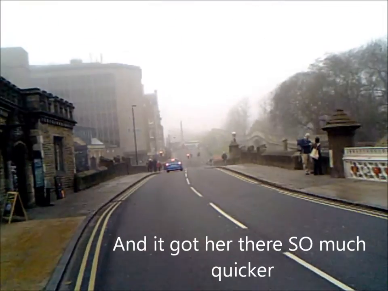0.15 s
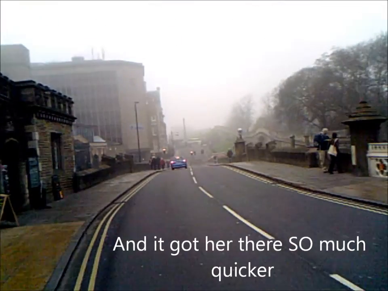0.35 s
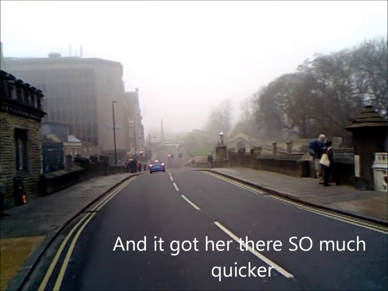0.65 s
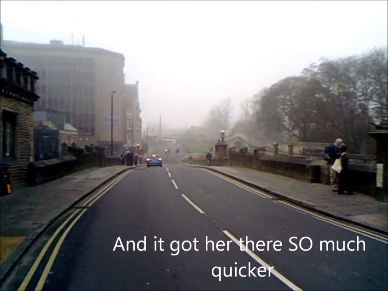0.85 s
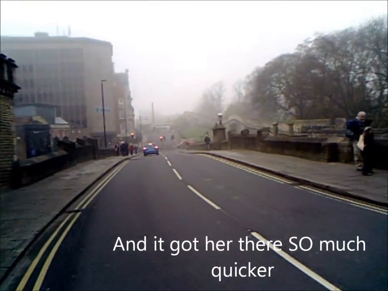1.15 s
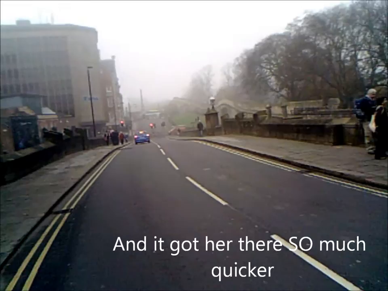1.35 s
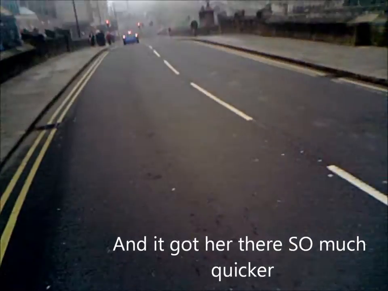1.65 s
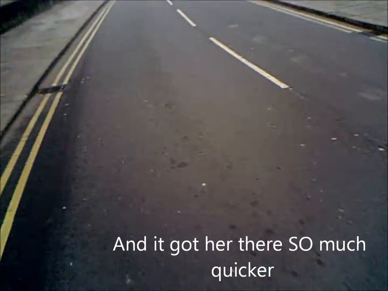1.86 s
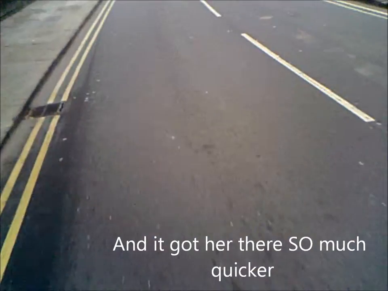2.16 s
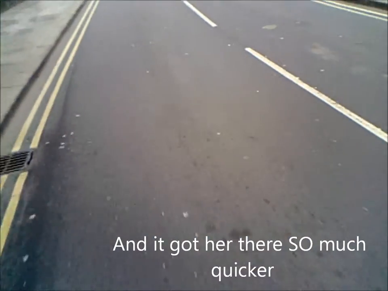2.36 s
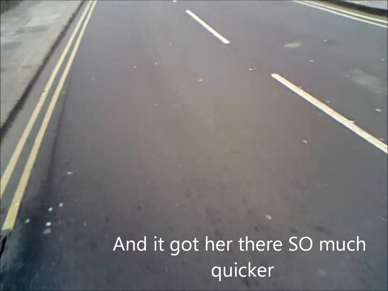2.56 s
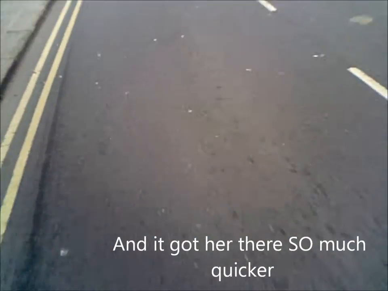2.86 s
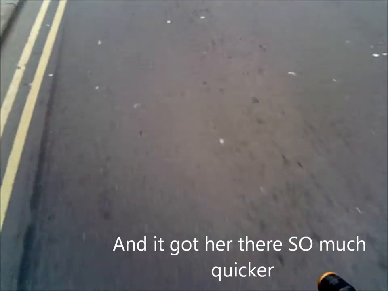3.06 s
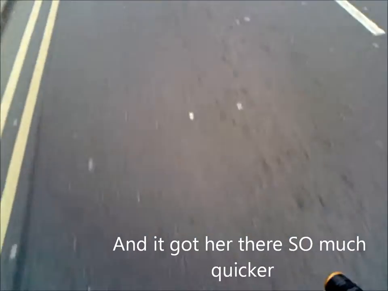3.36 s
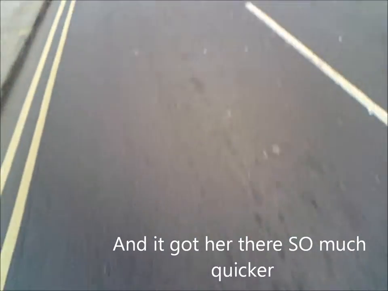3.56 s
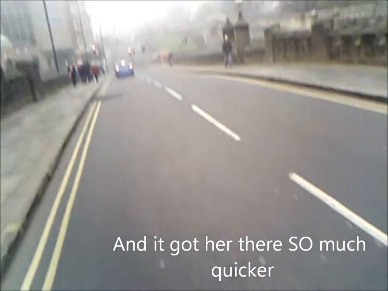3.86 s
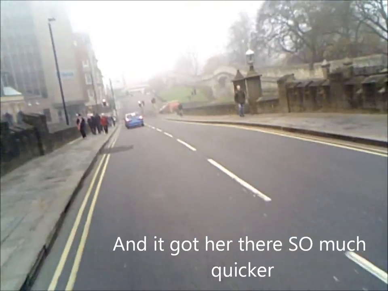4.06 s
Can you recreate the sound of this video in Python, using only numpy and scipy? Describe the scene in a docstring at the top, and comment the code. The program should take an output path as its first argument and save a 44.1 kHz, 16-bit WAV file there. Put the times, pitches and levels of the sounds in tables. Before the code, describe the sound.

Close mono pickup on a moving bicycle outdoors: soft wind rumble and small pressure pops open, then brake pads stick and slip on the rim with a reedy, metallic squeal. The squeal fades into a thin whine with short stutters, comes back firmly, peaks harsh and screaming late on, then eases unevenly. Dull wind gusts keep thudding while tyres and far traffic hiss quietly.

```python
"""Bicycle brake squeal: pads stick and slip on the rim about 400-500 times a second, a stack of partials
with slip-pulsed scraping noise that rings through fork and wheel, breaks off to a thin tone and returns.
Wind buffets the single microphone: filtered low noise in gusts, with short pressure steps.
Tyres and far traffic hiss below, as third-octave noise bands."""
import sys
import numpy as np
from scipy import signal
from scipy.io import wavfile
from scipy.ndimage import uniform_filter1d

SR = 44100
rng = np.random.default_rng(int(sys.argv[2]) if len(sys.argv) > 2 else 0)


def elevation(decibels):
    """Turn decibel levels (scalar or array-like) into linear amplitude ratios."""
    levels = np.asarray(decibels, float)
    return 10 ** (levels / 20)


def int16_out(signal):
    """Quantize to a 16-bit WAV file."""
    q = np.round(np.clip(np.atleast_2d(signal).T, -1, 1) * 32767)
    wavfile.write(sys.argv[1], SR, q.astype(np.int16))


N = 185969


def rms_one(x):
    """Scale to rms 1."""
    return x / np.sqrt(np.mean(x ** 2) + 1e-20)


def in_time(rows):
    """Columns of a curve table, one value a sample."""
    time_s, *columns = np.transpose(rows)
    return [np.interp(np.arange(N) / SR, time_s, column) for column in columns]


def drift(rate_hz):
    """Slow chance: noise twice through a one-pole low-pass at SR / 8; spread 1."""
    pole = np.exp(-16 * np.pi * rate_hz / SR)
    white = rng.standard_normal(N // 8 + 4002)
    slow = signal.lfilter([1], [1, -2 * pole, pole * pole], white)[4000:]   # skip the settling
    return np.interp(np.arange(N) / 8, np.arange(len(slow)), rms_one(slow - slow.mean()))


def cut(x, hz, kind, order=2):
    """Butterworth filter."""
    return signal.sosfilt(signal.butter(order, hz, kind, fs=SR, output="sos"), x)


def evened(x):
    """Level made steady over 40 ms."""
    return x / np.sqrt(uniform_filter1d(x ** 2, size=1764) + 1e-12)


def bump(centre_s, length_s):
    """Bell-shaped swell, down to 1/e at length_s either side of its centre."""
    return np.exp(-((np.arange(N) / SR - centre_s) / length_s) ** 2)


def pressure_steps():
    """Sudden wind pressure steps: decaying noise bursts, low-passed."""
    # start_s, peak_db
    pops = [(0.158, -45), (0.285, -26), (0.298, -40), (0.354, -39), (0.388, -22.5), (0.408, -30),
            (1.024, -24.5), (1.555, -40), (2.649, -24), (2.945, -27), (3.879, -41)]
    steps = np.zeros(N)
    decay = np.exp(-np.arange(900) / SR / 0.00057)
    for (start_s, peak_db), noise in zip(pops, rng.standard_normal((len(pops), 900))):
        pop = cut(cut(noise * decay, 210, "low", order=1), 890, "low")
        steps[round(start_s * SR):][:900] += elevation(peak_db) * pop / np.abs(pop).max()
    return steps


def wind():
    """Turbulence at the microphone: slow sway, lumpy buffeting, faster flutter in bursts, sharp steps."""
    # wind rising and dying away between the gusts: time_s, buffeting_db
    breeze = [(0, -16), (.2, -85), (.5, -50), (.8, -49), (1.5, -70), (1.75, -51), (2.2, -47), (2.5, -28.5),
              (2.8, -31.5), (3.1, -55), (3.45, -22), (3.7, -42), (4.22, -57)]
    # centre_s, buffeting_db, flutter_db, length_s
    gust_swells = [(0.186, -50, -44, 0.019), (0.295, -19, -29, 0.027), (0.404, -21, -39, 0.058),
                   (.59, -20.5, -49, 0.03), (0.722, -34, -48, 0.021), (1.009, -16, -26, 0.023),
                   (1.229, -23.5, -34, 0.024), (1.557, -41, -46, 0.026), (2.161, -34, -59, 0.041),
                   (2.335, -48, -48, 0.014), (2.576, -17, -26.5, 0.022), (2.646, -22, -32, 0.014),
                   (2.966, -28.5, -35, 0.051), (3.13, -26.5, -39, 0.037), (3.238, -15, -34, 0.011),
                   (3.384, -24, -32.5, .025), (3.581, -42, -30.5, .03), (3.865, -32, -34, 0.029),
                   (4.092, -20, -45, 0.034)]
    sway_db = -23.5
    breeze_db, = in_time(breeze)
    flutter_db = -40 + 0.21 * (breeze_db + 42)   # follows only a share of the breeze's swing
    buffet_gain, flutter_gain = elevation(breeze_db), elevation(flutter_db)
    for centre_s, gust_buffet_db, gust_flutter_db, length_s in gust_swells:
        swell = bump(centre_s, length_s)
        buffet_gain = buffet_gain + elevation(gust_buffet_db) * swell
        flutter_gain = flutter_gain + elevation(gust_flutter_db) * swell

    white = rng.standard_normal((3, N))
    lumps = drift(4.2)   # shared by buffeting and flutter
    sway = rms_one(cut(white[2], [3, 15], "band", order=3))
    buffet = cut(evened(cut(white[0], [18, 40], "band", order=1)), 27, "low")
    buffet = rms_one(buffet * elevation(2 * lumps))
    flutter = cut(white[1], 55, "high")
    flutter = cut(cut(flutter, 38, "low", order=1), 49.5, "low", order=1)
    flutter = rms_one(flutter * elevation(2.56 * drift(30.3) + 1.2 * lumps))
    return elevation(sway_db) * sway + buffet_gain * buffet + flutter_gain * flutter + pressure_steps()


def road():
    """Tyres and far traffic: third-octave noise bands, each flickering a little."""
    # time_s, level_db (in the band 580-740 Hz)
    road_level = [(0, -83), (.25, -77), (.5, -70), (.85, -71.5), (1.23, -62.5), (1.62, -73.5), (1.9, -60.5),
                  (2.05, -61.5), (2.3, -65.5), (3.37, -62), (4.22, -62.5)]
    # frequency_hz, density_db (per Hz, relative)
    road_colour = [(180, -17), (300, -0.5), (444, 2), (508, -7), (620, -4.5), (850, -4.5), (1400, -0.5),
                   (1900, -7.5), (3300, -9), (4050, -11.5), (5200, -15.5), (6400, -25), (8910, -19),
                   (11000, -53), (14300, -58), (22000, -120)]
    level_db, = in_time(road_level)
    colour_hz, colour_db = np.transpose(road_colour)
    edges_hz = 250 * 2 ** np.arange(0, 5.7, 1 / 3)
    white = rng.standard_normal((2, N))   # neighbouring bands take different noise
    hiss = np.zeros(N)
    for k, (low_hz, high_hz) in enumerate(zip(edges_hz, edges_hz[1:])):
        centre_octave = np.log2(low_hz * high_hz) / 2
        gain_db = np.interp(centre_octave, np.log2(colour_hz), colour_db) + 1.5 * drift(8)
        hiss += elevation(gain_db) * cut(white[k % 2], [low_hz, high_hz], "band")
    return elevation(level_db) * hiss / np.std(cut(hiss, [580, 740], "band"))


def frame(x):
    """Fork, rim and brake arms: parallel resonances, each applied twice so that the valleys stay dark."""
    # frequency_hz, width_hz (of one pass), level_db
    modes = [(1187, 280, 5.5), (1610, 286, 6), (2073, 150, 1), (2405, 682, 8), (2943, 200, 3),
             (3170, 620, 2.5), (4050, 1580, 0), (4674, 270, 0), (4872, 350, -1.5), (6310, 400, -3.5),
             (7390, 3200, 3.5), (8620, 1020, -1), (9310, 284, -3), (10650, 210, -7)]
    out = np.zeros(N)
    for hz, width_hz, level_db in modes:
        r = np.exp(-np.pi * width_hz / SR)
        numerator = [(1 - r * r) / 2, 0, (r * r - 1) / 2]
        section = numerator + [1, -2 * r * np.cos(2 * np.pi * hz / SR), r * r]
        out += elevation(level_db) * signal.sosfilt([section, section], x)
    return out


def slip_partials(phase, pitch_hz, loose):
    """Regular slips: partials 3-29, each swelling as the contact patch shifts; high ones wander more."""
    start = rng.uniform(0, 2 * np.pi, size=30)   # the frame smears each slip over the cycle
    slips = np.zeros(N)
    for k in range(3, 30):
        swell = elevation(4.88 * loose * drift(35.6))
        wander = 0.088 * k * loose * drift(80)
        slips += swell * np.cos(k * phase + start[k] + wander) * (k * pitch_hz < 11500)
    return slips


def pad_scrape(phase):
    """Rubbing noise pulsed by each slip, brighter than the slips."""
    scrape = rng.standard_normal(N) * (1 + 0.94 * np.cos(phase))
    return scrape + elevation(21) * cut(scrape, 2450, "high")


def brake():
    """Stick-slip of pads on rim: slips and scraping ring the frame, over two separate low partials."""
    # slip rate, jumping between near 500 and near 400 a second: time_s, pitch_hz
    slip_rate = [(0.72, 509), (0.76, 523), (0.785, 414), (0.82, 433.3), (0.855, 434.6), (0.872, 478),
                 (0.905, 498.4), (0.92, 520), (0.958, 473.4), (1.0, 496.7), (1.07, 484), (1.118, 483),
                 (1.13, 446.3), (1.148, 407), (1.28, 393.2), (1.377, 413.5), (1.4, 401), (1.495, 413.3),
                 (1.513, 512), (1.62, 512.4), (1.66, 489.6), (1.71, 508), (1.92, 518.6), (2.03, 490),
                 (2.08, 508), (2.2, 494.5), (2.32, 517), (2.38, 499), (2.392, 427), (2.41, 400),
                 (2.454, 420.8), (2.48, 394), (2.56, 404.7), (2.634, 394.5), (2.665, 410.2), (2.74, 393.7),
                 (2.76, 406.6), (2.9, 403.5), (2.955, 395.3), (3.045, 408), (3.093, 392), (3.205, 413),
                 (3.235, 424), (3.355, 416.2), (3.39, 421.2), (3.416, 415), (3.464, 420.4), (3.72, 394.5),
                 (3.785, 403.6), (3.812, 380), (3.845, 404), (3.875, 401), (3.93, 374.8), (4.04, 403.8),
                 (4.09, 405.2), (4.125, 384.2), (4.17, 410), (4.21, 384)]
    # hand on the lever, three squeezes with a light drag between:
    # time_s, buzz_db, treble_db (re buzz), first_partial_db
    grip = [(0.72, -109, -12, -55), (0.77, -48, -6, -48), (0.796, -33.5, -11, -63),
            (0.826, -27.5, -7.5, -59), (0.862, -39, -8.5, -51), (0.9, -38, -13, -42),
            (1.02, -33.5, -10, -37.5), (1.115, -41, -9.5, -41), (1.14, -35, -9, -57),
            (1.22, -32, -12.5, -50.5), (1.29, -38.5, -9, -48), (1.47, -46, -7.5, -60),
            (1.55, -60, -9, -50.5), (1.62, -96, -11, -62), (1.65, -52.5, -7.5, -47.5),
            (1.76, -65, -4, -49.5), (1.92, -70, 1.5, -49), (1.97, -83, -22, -62), (2.02, -56.5, 0, -47),
            (2.15, -52.5, -9, -42), (2.26, -69.5, -7, -50.5), (2.37, -56, -4, -45.5),
            (2.418, -30.5, -7.5, -54), (2.48, -29.5, -7.5, -40.5), (2.8, -30, -5, -41),
            (2.93, -25.5, -8.5, -37.5), (2.99, -35, -4, -42.5), (3.1, -30, -2, -39), (3.15, -24.5, -4, -35),
            (3.25, -20, -1, -32.5), (3.4, -23, 0.5, -37), (3.49, -24, -2.5, -37.5),
            (3.59, -27.5, -1, -37.5), (3.67, -30, -3.5, -40), (3.78, -39.5, -5, -52),
            (3.95, -36, -3.5, -46.5), (4.11, -31.5, -7, -49.5), (4.216, -45, -2.5, -50)]
    # rough and slick rim spots make the pads bite or let go briefly: centre_s, lift_db, length_s
    bites = [(1.657, 8, .012), (1.913, 16.5, 0.0088), (2.035, 14, .01), (2.09, 7, 0.011),
             (2.134, 10, 0.0092), (2.297, 17.5, .018), (2.449, -4.5, 0.01), (2.542, 2.5, 0.009),
             (2.596, -0.5, 0.0084), (2.668, -2.5, .012), (2.795, 5.5, 0.021), (2.836, -1.5, .012),
             (3.415, 1.5, 0.0072), (3.43, -4, 0.012), (3.568, -0.5, 0.013), (3.625, -6, 0.024),
             (3.811, 5, 0.016), (3.916, -3, 0.0088), (3.974, 2, .015), (4.018, -6, 0.013),
             (4.148, 0, 0.0046)]
    # modes that scream under a hard grip: low_hz, high_hz, most_db
    screams = [(4540, 5250, 9.5), (9340, 9900, 13)]
    firm_db = -30   # buzz level of a firm grip
    scrape_firm_db, scrape_fall_db_per_db, scrape_top_db = -15, 0.773, -4.5   # re slips
    scrape_growth_db_per_s = 2   # raspier as braking goes on
    scream_from_db, scream_rise_db_per_db = -25, 5   # buzz level where the added band equals the buzz in it
    second_firm_db, second_follows_buzz, second_follows_first = -39.5, 0.6, 0.44
    bite_in_first = 0.53   # share of a bite's lift in the first partial

    time_s = np.arange(N) / SR
    pitch_hz, = in_time(slip_rate)
    buzz_db, treble_db, first_db = in_time(grip)
    scrape_db = scrape_firm_db - scrape_fall_db_per_db * (buzz_db - firm_db)
    scrape_db = np.minimum(scrape_db + scrape_growth_db_per_s * time_s, scrape_top_db)
    loose = np.clip(1 + scrape_db / 32.8, 0.1, 1.3)   # a scraping grip is also an unsteady one
    # the uneven rim shakes the slip rate a little
    shake = 0.00586 * drift(12.26) + 0.00624 * drift(30.55) + 0.00507 * drift(160)
    pitch_hz = pitch_hz * (1 + loose * shake)
    phase = 2 * np.pi * np.cumsum(pitch_hz) / SR

    slips = rms_one(frame(slip_partials(phase, pitch_hz, loose)))
    scrape = rms_one(frame(pad_scrape(phase)))
    buzz = slips + elevation(scrape_db) * scrape
    low, treble = cut(buzz, 4000, "low", order=4), cut(buzz, 4000, "high", order=4)
    screaming = np.zeros(N)
    for low_hz, high_hz, most_db in screams:
        scream_db = np.minimum(scream_rise_db_per_db * (buzz_db - scream_from_db), most_db)
        screaming += elevation(scream_db) * cut(treble, [low_hz, high_hz], "band", order=1)
    treble = treble + screaming

    bite_db = sum(lift_db * bump(centre_s, length_s) for centre_s, lift_db, length_s in bites)
    buzz_db = buzz_db + bite_db
    first_db = first_db + bite_in_first * bite_db
    second_db = second_firm_db + second_follows_buzz * (buzz_db - firm_db)
    second_db = second_db + second_follows_first * (first_db - firm_db)

    buzz_gain = elevation(buzz_db + 2 * loose * drift(20))
    treble_gain = elevation(treble_db + 2.02 * loose * drift(26))
    buzz = buzz_gain * (evened(low) + treble_gain * evened(treble))
    first = elevation(first_db + 1.95 * drift(36) + 2 * drift(55)) * np.cos(phase)
    second = elevation(second_db + 3.06 * drift(31)) * np.cos(2 * phase)
    onset = np.clip((time_s - grip[0][0]) / 0.024, 0, 1)
    return onset * (buzz + np.sqrt(2) * (first + second))   # sqrt 2: partial levels are rms


def scene():
    """One microphone feeds both channels."""
    return np.tile(wind() + road() + brake(), (2, 1))


def roll_off(x):
    """The treble ends steeply here."""
    return signal.sosfilt(signal.butter(12, 11280, fs=SR, output="sos"), x)


def record(dry):
    """Microphone hiss, a steep cut above the treble and a small constant offset."""
    hiss_db, stop_hz, offset = -60, 12010, 0.006   # hiss level before its low-pass
    noisy = dry + elevation(hiss_db) * cut(rng.standard_normal(N), 7300, "low")
    steep = signal.cheby2(12, 60, stop_hz, fs=SR, output="sos")   # 60 dB down from stop_hz
    dull = signal.sosfilt(steep, noisy)
    return roll_off(dull + offset)


dry = scene()
out = record(dry)
int16_out(out)
```